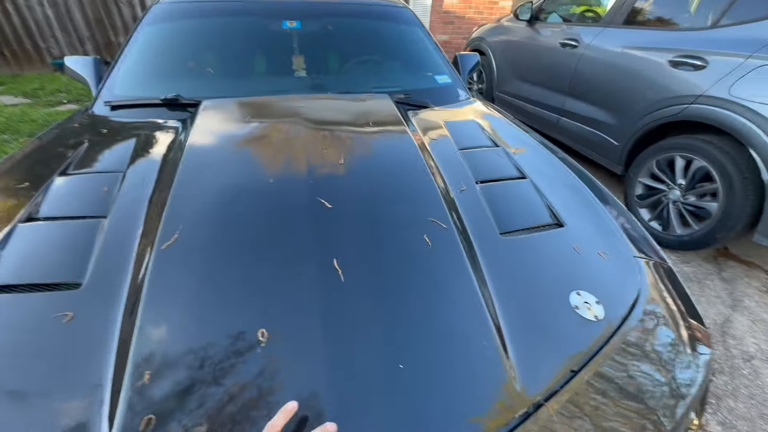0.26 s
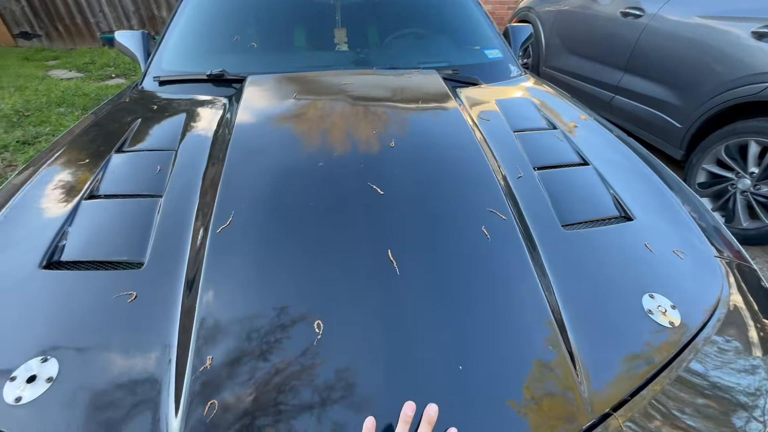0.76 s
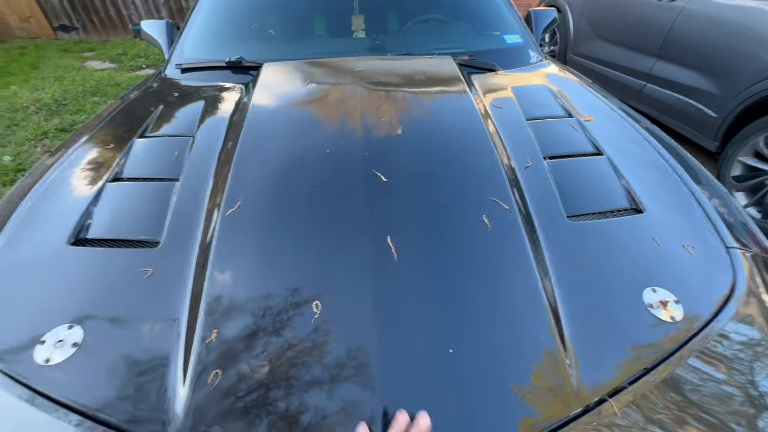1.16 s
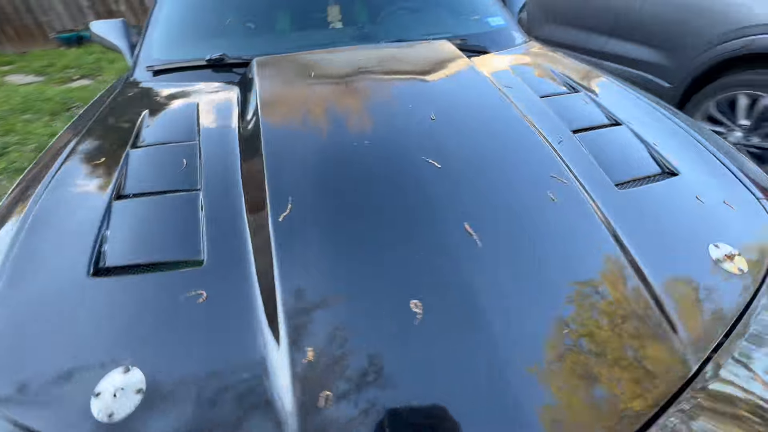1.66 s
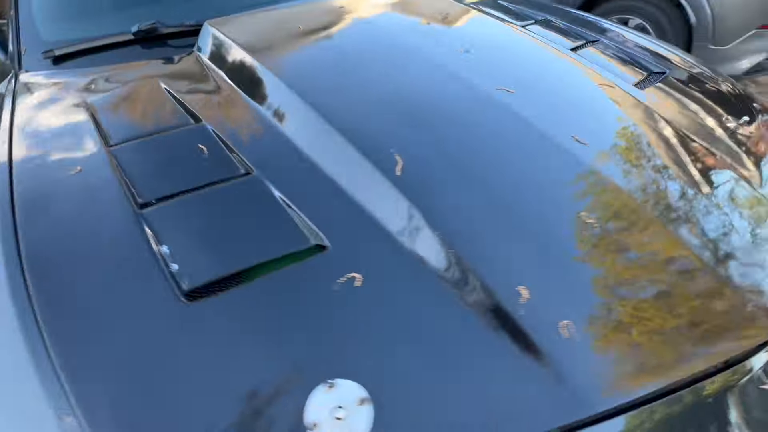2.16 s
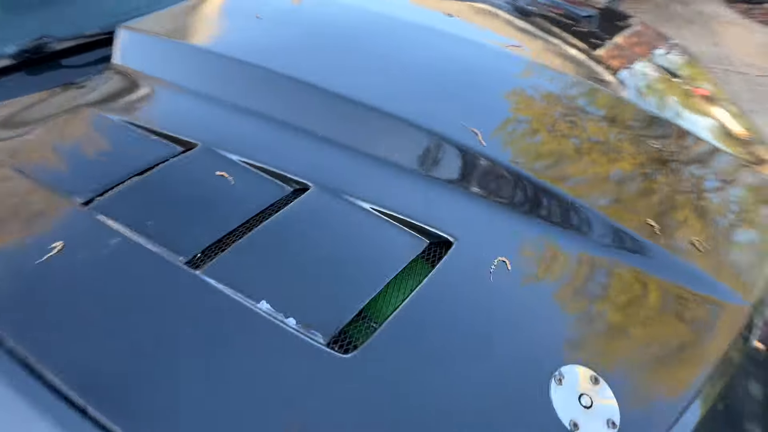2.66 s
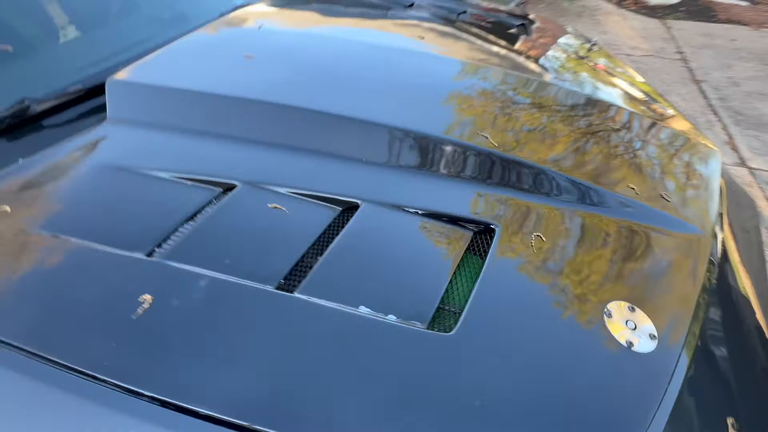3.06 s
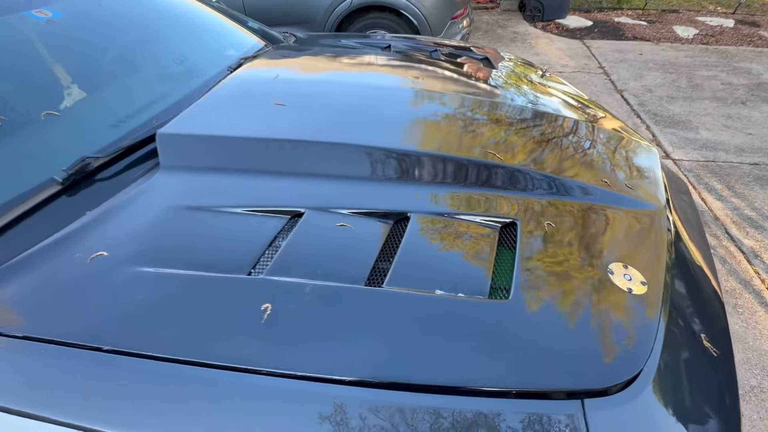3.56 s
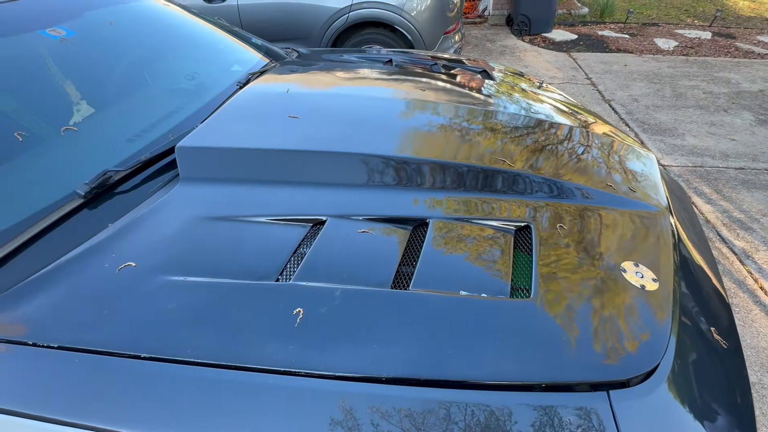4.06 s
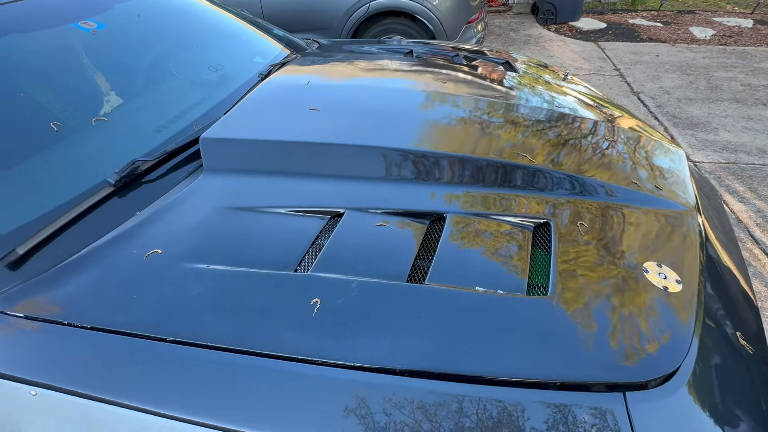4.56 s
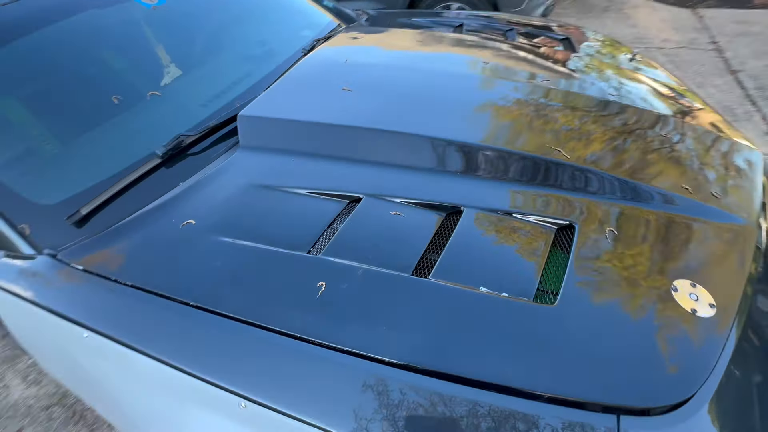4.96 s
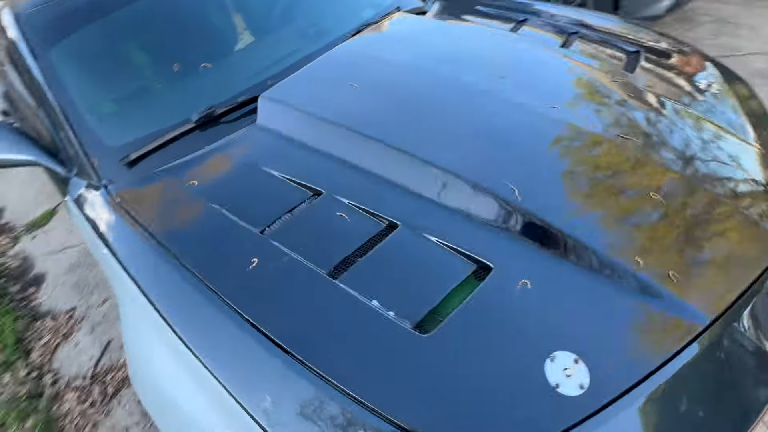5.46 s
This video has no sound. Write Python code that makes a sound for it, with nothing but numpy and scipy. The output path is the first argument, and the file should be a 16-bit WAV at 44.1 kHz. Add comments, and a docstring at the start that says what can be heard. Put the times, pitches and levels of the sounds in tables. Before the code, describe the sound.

A car hood falls onto its safety catch at about 0.05 s: a hollow sheet-metal boom with a clattering steel clack and quick weakening bounces. From 0.5 s a palm pushes it down, with growing rubbing and scraping, spring creaks near 0.7 and 0.78 s, and a brief rough squeal jumping from high to lower pitch. At 0.83 s the latch snaps shut, brighter and louder, with a deep panel thump and short driveway echo. Then it is quiet outdoors, with soft town rumble and faint hiss. A songbird whistles and slurs from 1 to 2.3 s and again after 5 s; raspy chips, tiny pips and hoarse calls fill 3 to 5 s. Clothes rustle close by, sleeve strokes and dry clicks clustering at 2.4-3.4 s. A low engine drone strengthens after 3 s, strongest around 4.5-5.1 s, leaning left, while another engine rises in pitch farther off and tyre roar passes near 4.4 s.

```python
"""A car hood thuds onto its safety catch; a hand then presses it home, the latch squeals and snaps shut.
The panel booms from ringing modes and dense body noise; the latch cracks with short filtered noise.
The squeal is a jittery stick-slip tone whose overtones ring the latch plate.
Nearby an engine drones in harmonics, a second gathers speed further off, birds whistle on gliding tones
and shaped noise makes the clothes rustling close to a two-port phone microphone."""
import sys
import numpy as np
from scipy import signal
from scipy.fft import rfft, irfft, next_fast_len
from scipy.io import wavfile
from scipy.ndimage import uniform_filter1d, map_coordinates

SR = 44100
rng = np.random.default_rng(int(sys.argv[2]) if len(sys.argv) > 2 else 0)


def master(y):
    """Save y as 16-bit WAV."""
    cut = np.clip(np.atleast_2d(y).T, -1, 1)
    pcm = np.round(cut * 32767)  # scale
    wavfile.write(sys.argv[1], SR, pcm.astype(np.int16))


N = 251811
T = np.arange(N) / SR


def undb(db):
    """Decibels to gain."""
    return 10 ** (np.asarray(db) / 20)


def unit(x):
    """Scale to rms 1."""
    return x / np.sqrt(np.mean(x ** 2))


def curves(rows):
    """Columns of a table, joined by straight lines in time."""
    time_s, *columns = np.transpose(rows)
    return [np.interp(T, time_s, column) for column in columns]


def at(points, hz):
    """Read a table on a log-frequency axis."""
    f, value = np.transpose(points)
    return np.interp(np.log(hz + 1e-3), np.log(f), value)


def colour(x, points):
    """Filter by a gain curve of (hz, gain_db) points."""
    size = next_fast_len(x.shape[-1])
    hz = np.arange(size // 2 + 1) * SR / size
    spectrum = rfft(x, size) * undb(at(points, hz))
    return irfft(spectrum, size)[..., :x.shape[-1]]


def walk(rate_hz):
    """Smooth random drift with a spread near 1."""
    step = int(SR / rate_hz)
    knots = rng.standard_normal(N // step + 2)
    drift = np.interp(np.arange(N) / step, np.arange(N // step + 2), knots)
    return 1.22 * uniform_filter1d(drift, step // 2)


def add(out, start_s, x):
    """Mix x in from start_s."""
    i = int(start_s * SR)
    out[..., i:i + x.shape[-1]] += x[..., :N - i]


def sine(hz):
    """Pure tone on a moving pitch; rms 1."""
    return np.sqrt(2) * np.sin(2 * np.pi * np.cumsum(hz) / SR)


def stack(hz, orders, flutter_db=0, flutter_hz=5):
    """Partials on multiples of a moving pitch, each wavering in level on its own."""
    phase = 2 * np.pi * np.cumsum(hz) / SR
    out = 0
    for multiple, db in orders:
        level = undb(db + flutter_db * walk(flutter_hz))
        partial = np.sqrt(2) * np.sin(multiple * phase + rng.uniform(0, 2 * np.pi))
        out = out + level * partial * (multiple * hz < SR / 2)
    return out


def swell(centre_s, half_width_s, db):
    """Bell-shaped rise and fall; 1/e at half_width_s."""
    return undb(db) * np.exp(-((T - centre_s) / half_width_s) ** 2)


def ports(x, lag_ms, left_db):
    """Sound reaches the right port lag_ms late; left_db is left over right."""
    late = map_coordinates(x, [np.arange(N) - lag_ms * 1e-3 * SR], order=3)
    return np.array([x * undb(left_db / 2), late * undb(-left_db / 2)])


def diffuse(size, split_hz):
    """Noise from all sides: alike at both ports below split_hz, unrelated above."""
    a, b = rng.standard_normal((2, size))
    highpass = signal.butter(1, min(split_hz, SR / 4), "high", fs=SR, output="sos")
    b = signal.sosfilt(highpass, b)
    return np.array([a + b, a - b])


def ring(spectrum, t60s, split_hz, seconds=1):
    """Dense modes: noise whose octaves die away at their own rates; energy 1."""
    t = T[:int(seconds * SR)]
    spectra = rfft(colour(diffuse(len(t), split_hz), spectrum))
    hz = np.arange(len(t) // 2 + 1) * SR / len(t)
    octave = np.log2(np.clip(hz, 32, 16384))
    out = 0
    for k in range(5, 15):
        band = irfft(spectra * np.maximum(1 - abs(octave - k), 0), len(t))
        out = out + band * np.exp(-np.log(1000) * t / at(t60s, 2 ** k))
    return out / np.sqrt(np.sum(out ** 2) / 2)


def scatter(x, tail):
    """Convolve a mono or two-port sound with a two-port tail."""
    return signal.fftconvolve(np.atleast_2d(x), tail, axes=1)[:, :N]


# outdoor air spectrum: hz [Hz], density_db [dB per Hz, relative]
AIR = [(15, -55.5), (25, -30.5), (48, -3), (75, -0.5), (100, 4), (140, -5.5), (175, -4), (250, -8.5),
       (295, -8), (480, -16), (1580, -25), (2630, -34.5), (4000, -43), (5500, -56.5), (9000, -56),
       (12000, -72)]


def air(low_db=-44, high_db=-56, left_db=3):
    """Wavering town rumble, nearly alike at both ports, under a smooth distant hiss."""
    noise = colour(diffuse(N, split_hz=330), AIR)
    low = signal.sosfiltfilt(signal.butter(2, 500, fs=SR, output="sos"), noise)
    balance_db = np.array([[left_db], [-left_db]]) / 2
    rumble = unit(low) * undb(low_db + 0.36 * walk(27) + balance_db)
    hiss = unit(noise - low) * undb(high_db + 0.21 * walk(3.4))
    return rumble + hiss


# road roar spectrum: hz [Hz], density_db [dB per Hz, relative]
ROAR = [(100, -7), (300, -5), (480, -9), (640, 4), (1000, 5), (1350, -5), (1700, -10.5), (2050, -23),
        (2450, -14), (3100, -26.5), (4000, -39.5), (9000, -71.5)]


def road_roar(nearest_s=4.38, half_power_s=0.53, peak_db=-47.5):
    """Tyre-road noise swells and fades as the distance to a passing vehicle changes."""
    distance = np.hypot(1, (T - nearest_s) / half_power_s)
    noise = unit(colour(rng.standard_normal(N), ROAR))
    return noise * undb(peak_db + 1.1 * walk(6)) / distance


# partials of the far engine: shaft_multiple [ratio], level_db [dB, relative]
FAR_ORDERS = [(3, -1), (6, 0.5), (8, -2), (9, -1), (12, -14), (13, -14.5), (15, -15.5), (20, -14),
              (22, -16), (25, -16.5), (27, -15.5)]
# its loudness: time_s [s], level_db [dB]
FAR_LEVEL = [(1.1, -65.5), (1.6, -51), (2.4, -54.5), (3.2, -49.5), (4, -56.5), (5, -49.5)]


def far_engine(start_hz=35.37, rise_hz_per_s=1.04):
    """Engine gathering speed: shaft harmonics on a steadily rising pitch."""
    shaft_hz = (start_hz + rise_hz_per_s * T) * (1 + .002 * walk(13))
    level_db, = curves(FAR_LEVEL)
    return stack(shaft_hz, FAR_ORDERS, flutter_db=3.5, flutter_hz=2.4) * undb(level_db)


# droning engine: time_s [s], level_db [dB], upper_db [dB, scales the exhaust partials]
DRONE = [(1.1, -49, -69.5), (2.6, -48, -65.5), (3.4, -36, -65), (4.05, -37, -50), (4.5, -32.5, -48),
         (5.1, -32, -48), (5.5, -37, -59)]
# its firing rate: time_s [s], firing_hz [Hz]
FIRING = [(1.3, 95.93), (3.1, 98.18), (4, 97.3), (4.4, 98.6), (5.7, 98.16)]
# its exhaust partials: firing_multiple [ratio], level_db [dB, relative]
EXHAUST = [(2, -10), (3, -14.5), (4, -3), (5, -11.5), (5.5, -14), (5.75, -12), (6, 1), (6.75, -11),
           (7, -9.5), (7.75, -6.5), (8, -8), (9, -10), (9.5, -9.5), (10.25, -8.5), (11, -11.5)]


def drone():
    """Exhaust pulses: a strong tone at the firing rate under fluttering upper partials."""
    level_db, upper_db = curves(DRONE)
    firing_hz, = curves(FIRING)
    firing_hz = firing_hz * (1 + 0.0019 * walk(14))
    tone = sine(firing_hz) * undb(level_db + 0.28 * walk(10))
    return tone + stack(firing_hz, EXHAUST, flutter_db=3.0, flutter_hz=4) * undb(upper_db)


def engines():
    """Both engines and the road roar arrive from one side, left port first."""
    return ports(drone() + far_engine() + road_roar(), lag_ms=0.42, left_db=4.5)


def note(hz, db, rasp, edge=.5):
    """Bird note on a trembling pitch; edge is the share spent swelling and fading."""
    hz = hz * (1 + rasp * walk(780)[:len(hz)])
    return undb(db) * signal.windows.tukey(len(hz), edge) * sine(hz)


def glide(length_s, start_hz, middle_hz, end_hz):
    """Pitch that bends through three points."""
    bend = np.polyfit([0, .5, 1], [start_hz, middle_hz, end_hz], 2)
    return np.polyval(bend, np.linspace(0, 1, int(length_s * SR)))


def calls(rows, length_s, fall, rasp):
    """Calls whose pitch falls ever faster, losing the share fall by the end."""
    out = np.zeros(N)
    for start_s, hz, db in rows:
        pitch_hz = glide(length_s, hz, hz * (1 - fall / 4), hz * (1 - fall))
        add(out, start_s, note(pitch_hz, db, rasp, edge=0.92))
    return out


def trees(dry_birds, direct_db, echo_db, echo_t60_s):
    """Trees and house fronts scatter the birds into a decaying noise tail."""
    t60s = [(500, echo_t60_s), (8000, echo_t60_s)]
    echo = ring([(500, 0.0057), (8000, 0.016)], t60s, split_hz=500)
    direct = ports(dry_birds, lag_ms=0.074, left_db=1.5)
    return undb(direct_db) * direct + undb(echo_db) * scatter(dry_birds, echo)


# hoarse calls of a distant bird: start_s [s], pitch_hz [Hz], level_db [dB before trees]
HOARSE = [(3.79, 2586, -60.5), (3.9, 1748, -55.5), (4.12, 2500, -59), (4.29, 2555, -55.5),
          (4.63, 2500, -58.5), (4.9, 2310, -56)]


def hoarse_bird():
    """Strong pitch jitter roughens each call."""
    dry_calls = calls(HOARSE, length_s=.14, fall=.04, rasp=.07)
    return trees(dry_calls, direct_db=-6.5, echo_db=-5.5, echo_t60_s=0.7)


# raspy falling chips: start_s [s], pitch_hz [Hz], level_db [dB before trees]
CHIPS = [(.53, 5180, -59), (2.22, 4380, -58.5), (3.07, 3755, -56.5), (3.95, 4660, -68.5), (4.04, 3700, -59),
         (4.055, 4600, -62), (4.14, 3810, -59), (4.57, 4760, -62.5), (4.66, 3500, -63.5), (4.68, 4840, -70),
         (4.94, 4900, -57), (5.0, 3810, -66), (5.15, 3410, -63)]


def chipping_birds():
    """Short raspy tones that fall by a tenth."""
    dry_calls = calls(CHIPS, length_s=0.065, fall=.1, rasp=0.024)
    return trees(dry_calls, direct_db=-8.5, echo_db=-7.5, echo_t60_s=0.61)


# clear pips of a small bird: start_s [s], pitch_hz [Hz], level_db [dB before trees]
PIPS = [(3.445, 5070, -66), (3.462, 3975, -59.5), (3.503, 3450, -64.5), (3.558, 5050, -69),
        (3.585, 3960, -69)]


def pipping_bird():
    """Brief tones with little jitter and hardly any fall."""
    dry_calls = calls(PIPS, length_s=0.026, fall=0.017, rasp=.006)
    return trees(dry_calls, direct_db=-1.0, echo_db=-8.0, echo_t60_s=0.4)


# phrases: start_s [s], stretch [ratio], whistle_length_s [s], whistle_hz [Hz],
# whistle_db [dB before trees], slurs_db [dB before trees], max_slurs [count]
SONG = [(1.024, 0.96, 0.21, 3610, -63, -58.5, 3), (1.399, 1.01, 0.11, 3568, -49.5, -54.5, 3),
        (1.775, 1.02, 0.16, 3657, -59.5, -57.5, 7), (2.175, 1, 0.089, 3550, -56, -57, 0),
        (5.07, 1, 0.091, 3560, -77.5, -55, 3), (5.44, 1.03, 0.23, 3610, -63, -52.5, 1)]
# slurs of a phrase: offset_s [s before stretch], length_s [s], start_hz, middle_hz, end_hz [Hz before scatter],
# level_db [dB over slurs_db, before scatter]
PHRASE = [(0.178, 0.048, 2312, 2790, 2990, 1.5), (0.274, 0.029, 1960, 2370, 2640, 1),
          (0.314, .034, 2873, 2633, 2130, 3)]
# short falling notes before some slurs: start_s [s], pitch_hz [Hz], level_db [dB before trees]
GRACE_NOTES = [(1.54, 2950, -55.5), (1.918, 2950, -58), (5.586, 2950, -54.5)]


def songbird():
    """A whistle scoops up and holds unsteadily, then up to three slurs vary in pitch and level."""
    scoop_hz, scoop_s, waver_db = 299, 0.015, 2.8
    slur_scatter, slur_scatter_db = .015, 1.5  # pitch share, level
    song = calls(GRACE_NOTES, length_s=.026, fall=0.21, rasp=0.019)
    for start_s, stretch, held_s, hz, whistle_db, slurs_db, max_slurs in SONG:
        pitch_hz = hz - scoop_hz * np.exp(-T[:int(held_s * SR)] / scoop_s)
        waver = walk(45)[:len(pitch_hz)]
        whistle = note(pitch_hz * (1 + .003 * waver), whistle_db + waver_db * waver, rasp=.006, edge=.2)
        add(song, start_s, whistle)
        for offset_s, length_s, start_hz, middle_hz, end_hz, db in PHRASE[:round(max_slurs)]:
            sharp, loud = rng.standard_normal(2)
            pitch_hz = glide(length_s, start_hz, middle_hz, end_hz) * (1 + slur_scatter * sharp)
            slur = note(pitch_hz, slurs_db + db + slur_scatter_db * loud, rasp=0.014, edge=0.52)
            add(song, start_s + stretch * offset_s, slur)
    return trees(song, direct_db=-3.5, echo_db=-5.0, echo_t60_s=0.99)


# bouts of cloth: centre_s [s], half_width_s [s], level_db [dB]
RUSTLES = [(0.668, 0.018, -60), (1.775, 0.31, -61), (2.453, 0.15, -59.5), (3.175, 0.19, -60),
           (5.235, 0.17, -62), (5.67, 0.025, -54.5)]
# cloth spectrum: hz [Hz], gain_db [dB, relative]
CLOTH = [(300, 13.5), (1600, 2.5), (3500, 1), (6000, -12.5), (9000, -8.5), (11000, -20.5), (15000, -14)]


def rustles(folds_db=1.5, crackle_db=2.0):
    """Short swells of cloth noise with a fast random crackle."""
    bouts = sum(swell(*bout) for bout in RUSTLES) * undb(folds_db * walk(35))
    crackle = diffuse(N, split_hz=600) * undb(crackle_db * walk(400))
    return bouts * unit(colour(crackle, CLOTH))


# sleeve strokes: centre_s [s], half_width_s [s], level_db [dB before shared peaks], centre_hz [Hz]
SWISHES = [(2.48, 0.07, -62, 2094), (2.865, 0.17, -50, 940), (2.975, 0.089, -48.5, 1630),
           (3.134, 0.16, -54.5, 2110)]
# stroke spectrum: centre_multiple [ratio], gain_db [dB, relative]
SWISH = [(.12, -18), (.35, 4), (.62, 1.5), (1, 0), (1.45, -8), (1.9, -12), (2.6, -36), (7, -60)]
# peaks that every stroke shares: hz [Hz], gain_db [dB]
SWISH_PEAKS = [(1100, 1), (1350, 0), (1750, 1.5), (2050, -3), (2450, 5), (3100, -8.5), (3700, 3),
               (4600, -3.5)]


def sleeve(catch_db=1.2, grain_db=2):
    """Soft strokes of grainy noise, each coloured around its own centre."""
    strokes = 0
    for centre_s, half_width_s, db, centre_hz in SWISHES:
        fibres = diffuse(N, split_hz=610) * undb(catch_db * walk(55) + grain_db * walk(600))
        spectrum = [(centre_hz * k, gain_db) for k, gain_db in SWISH]
        strokes = strokes + swell(centre_s, half_width_s, db) * unit(colour(fibres, spectrum))
    return colour(strokes, SWISH_PEAKS)


# handling ticks: start_s [s], level_db [dB before gain_db]
TICKS = [(2.353, -52), (2.45, -44), (3.033, -48), (3.22, -45), (3.38, -52), (5.293, -57), (5.311, -57)]


def ticks(t60_s=.014, gain_db=9):
    """Small dry clicks of quickly dying noise."""
    out = np.zeros((2, N))
    spectrum = [(800, 1), (4500, 2), (7000, -5), (15000, -12)]
    for start_s, db in TICKS:
        click = ring(spectrum, [(500, t60_s), (8000, t60_s)], split_hz=3000, seconds=.04)
        add(out, start_s, undb(db + gain_db) * click)
    return out


# palm pushing the hood against its springs: time_s [s], level_db [dB]
PRESS = [(.45, -71.5), (.57, -55.5), (.7, -40.5), (.82, -24.5), (.86, -57)]
# rubbing of hinges and stops: hz [Hz], gain_db [dB, relative]
PRESS_COLOUR = [(30, -7.5), (80, 12), (250, 6.5), (450, 6), (750, -2.5), (1200, -17), (1800, -10),
                (2700, -18.5), (4000, -33.5), (12000, -49.5)]


def press():
    """Hinges and rubber stops rub as the panel is pushed down."""
    level_db, = curves(PRESS)
    pushing = (T > PRESS[0][0]) * (T < PRESS[-1][0])
    rubbing = unit(colour(diffuse(N, split_hz=560), PRESS_COLOUR))
    return rubbing * undb(level_db + 2 * walk(82)) * pushing


# creaks of the hinge springs: centre_s [s], half_width_s [s], level_db [dB]
CREAKS = [(.689, .02, -43.5), (0.776, .025, -36.5)]
# spring resonances: hz [Hz], gain_db [dB, relative]
CREAK_COLOUR = [(200, -16.5), (520, -2), (760, 6), (1000, -4), (1300, -13.5), (2000, -16.5), (2550, -3.5),
                (3500, -27.5), (5200, -27.5), (7000, -33.5), (15000, -40)]


def grains(per_s, scatter_db):
    """Tiny slips at random moments and of random size; rms 1."""
    hits = rng.random(N) < per_s / SR
    sizes = undb(scatter_db * np.clip(rng.standard_normal(N), -2, 2))
    return unit(hits * sizes * rng.choice([-1, 1], N))


def creaks(slips_per_s=750, t60_s=0.023):
    """Hinge springs give way in runs of small slips that ring them."""
    spring = ring(CREAK_COLOUR, [(500, t60_s), (8000, t60_s)], split_hz=450, seconds=0.044)
    slips = grains(slips_per_s, scatter_db=0.5) * sum(swell(*creak) for creak in CREAKS)
    return scatter(slips, spring)


# steel-on-steel spectrum: hz [Hz], gain_db [dB, relative]
SCRAPE_COLOUR = [(300, -20), (1000, -5), (1400, -0.5), (1800, 1.5), (2100, -6), (2500, -5), (3100, -20.5),
                 (5500, -19), (12000, -41)]


def scrape(start_s=0.5, end_s=.825, start_db=-62, rise_db_per_s=57, grain_db=2):
    """The striker slides down the dry latch ramp, louder as the push grows."""
    sliding = (T > start_s) * (T < end_s)
    level_db = start_db + rise_db_per_s * (np.minimum(T, end_s) - start_s)
    grit = diffuse(N, split_hz=700) * undb(grain_db * walk(500))
    return sliding * undb(level_db) * unit(colour(grit, SCRAPE_COLOUR))


# latch plate resonances: hz [Hz], gain_db [dB, relative]
OVERTONES = [(3100, -12.5), (3700, -12), (4500, 0.5), (4950, 1.5), (5400, -6), (6150, 1.5), (6700, -8),
             (7900, -9.5), (8900, 0), (10800, -9.5), (13500, -5.5), (15500, -11)]


def squeal(rows, lag_ms, left_db):
    """Stick-slip metal: an uneven tone, its overtones and scraping noise coloured by the latch plate."""
    scrape_db, scatter_db = -5, -14
    hz, tone_db, overtones_db = curves(rows)
    hz = hz * (1 + .024 * walk(1500) + 0.011 * walk(250))
    sounding = (T > rows[0][0]) * (T < rows[-1][0])
    harmonics = stack(hz, [(k, 0) for k in range(2, 11)], flutter_db=3.5, flutter_hz=160)
    slips = unit(harmonics) + undb(scrape_db) * rng.standard_normal(N)
    rasp = 1 + .26 * walk(1100)
    tone = undb(tone_db + 1.1 * walk(300)) * sine(hz) * rasp * sounding
    edge = undb(overtones_db) * unit(colour(slips, OVERTONES)) * sounding
    # the gap under the hood scatters part of it
    gap = ring([(500, 0.0022), (8000, 0.0017)], [(500, 0.16), (8000, 0.07)], split_hz=460, seconds=0.18)
    direct = ports(tone, lag_ms, left_db) + ports(edge, lag_ms=.036, left_db=-1.5)
    return direct + undb(scatter_db) * scatter(tone + edge, gap)


# first, higher squeal: time_s [s], pitch_hz [Hz], level_db [dB], overtones_db [dB]
SQUEAL_HIGH = [(.718, 2490, -50, -76), (.73, 2450, -41, -74), (.756, 2400, -44, -62),
               (.764, 2220, -28, -36), (.77, 2160, -31, -32), (.777, 2160, -24, -33),
               (.795, 2199, -23.5, -35), (.802, 2330, -19.5, -40), (.805, 2600, -29, -43),
               (.811, 2950, -31, -42)]
# second, lower squeal: time_s [s], pitch_hz [Hz], level_db [dB], overtones_db [dB]
SQUEAL_LOW = [(.799, 1690, -38, -55), (.81, 1660, -26, -34), (.8135, 1635, -16, -17),
              (.819, 1575, -13, -16.5), (.8235, 1540, -9, -17.5), (.8275, 1545, -9.5, -32),
              (.835, 1565, -9, -29), (.84, 1545, -22, -38)]


def latch_squeals():
    """Two overlapping squeals, each with its own port balance."""
    high = squeal(SQUEAL_HIGH, lag_ms=.11, left_db=-6.5)
    return high + squeal(SQUEAL_LOW, lag_ms=.21, left_db=-0.5)


# whole-panel heaves as the latch stops it: start_s [s], level_db [dB]
HEAVES = [(.057, -16.5), (0.837, -15)]


def heaves(pitch_hz=150.2, peak_s=.004):
    """Deep, quickly damped swing of the whole panel; its envelope peaks at peak_s."""
    out, t = np.zeros(N), T[:SR // 8]
    envelope = t / peak_s * np.exp(1 - t / peak_s)
    for start_s, db in HEAVES:
        add(out, start_s, -undb(db) * np.sin(2 * np.pi * pitch_hz * t) * envelope)
    return ports(out, lag_ms=.1, left_db=2.5)


def rebounds(start_s, first_db, gap_s, fade_db, count):
    """Times and levels of contacts that thin out and weaken; each gap is 1.1 times the last."""
    k = np.arange(count)
    gaps_s = gap_s * 1.1 ** k
    return zip(start_s + np.cumsum(gaps_s) - gaps_s, first_db - fade_db * k)


# steel latch spectrum: hz [Hz], gain_db [dB before tilt, relative]
LATCH = [(100, -15), (700, 1.5), (1100, 2.5), (1500, 9), (2400, -0.5), (3300, 4.5), (3900, -5.5),
         (4700, 2.5), (5700, -8), (9000, -8.5), (12000, -19.5), (16000, -14)]


def clack(level_db, tilt_db_per_octave=0):
    """One grainy crack of the steel latch; tilt pivots at 3 kHz."""
    t60_s, gain_db, grain_db = 0.077, 2, 3
    steel = [(hz, db + tilt_db_per_octave * np.log2(hz / 3000)) for hz, db in LATCH]
    crack = ring(steel, [(1000, t60_s), (12000, t60_s)], split_hz=200, seconds=0.079)
    return undb(level_db + gain_db) * crack * undb(grain_db * walk(700)[:crack.shape[1]])


# striker hits: start_s [s], level_db [dB before clack gain], fade_db [dB per rebound],
# tilt_db_per_octave [dB per octave]
STRIKES = [(0.042, -11, 5.5, -3), (0.0513, -0.5, 9, -1.5), (0.0602, -13, 1.5, 1), (0.8318, 8, 9, 3),
           (.8358, 3.5, 7, -1.5), (0.842, -11, 6, -1.5), (.871, -20, 3, 3.5)]


def latch_strikes():
    """The striker hits the latch and chatters in weakening rebounds."""
    out = np.zeros((2, N))
    for start_s, first_db, fade_db, tilt_db_per_octave in STRIKES:
        for hit_s, db in rebounds(start_s, first_db, .003, fade_db, count=4):
            add(out, hit_s, clack(db, tilt_db_per_octave))
    return out


# hood panel modes: hz [Hz], level_db [dB, relative], t60_s [s]
PANEL = [(59.54, -13.5, 0.55), (85, -16, 0.72), (113.1, -15.5, 0.55), (147, -14.5, 0.64), (176, -14, 0.38),
         (247, -18.5, 0.22), (272, -21.5, 0.48), (333, -8.5, 0.15), (370, -6, 0.11), (440, -5.5, 0.12),
         (492.5, -11.5, 0.11), (531, -13, 0.17), (575, -9.5, 0.13), (612.3, -2.5, 0.12), (671.5, -4, 0.14),
         (737, -7, 0.15), (807, -12, 0.13), (991, -13.5, 0.12), (1250, -17, 0.096), (1544, -11, 0.1)]
# dense car body modes: hz [Hz], gain_db [dB, relative]
BODY = [(25, -35), (55, -4.5), (120, -1.5), (230, -4.5), (400, -1), (640, 5), (800, -3), (1100, -7.5),
        (2000, -6), (4000, -21), (16000, -53.5)]
# their decay: hz [Hz], t60_s [s]
BODY_T60 = [(60, 0.54), (150, 0.34), (300, 0.34), (600, 0.079), (1200, 0.15), (8000, 0.081)]
# panel on its stops: start_s [s], thud_db [dB, relative], dull_hz [Hz, dulls above], fade_db [dB per bounce]
LANDINGS = [(0.0458, -14, 685, 5.5), (0.0557, -4.5, 663, 5), (0.0651, -10.5, 636, 9.5),
            (.0875, -13, 510, 4), (0.113, -16.5, 561, 8.5), (.137, -17, 265, 5.5), (0.8332, -10, 1410, 2),
            (0.8398, -3.5, 1290, 11.5), (0.8462, -4, 1010, 3.5), (.893, -18.5, 700, 12)]


def panel_landings(modes_db=-13, body_db=11, knock_db=-5, rattle_db=-13, left_db=3, lag_ms=0.25):
    """Each bounce shoves the panel, rings it and the body behind it, and rattles the latch."""
    out = np.zeros((2, N))
    age_s = np.maximum(T[:SR] - np.array([[0], [lag_ms * 1e-3]]), 0)
    modes = np.array([undb(db) * np.sin(2 * np.pi * hz * age_s) * np.exp(-np.log(1000) * age_s / t60_s)
                      for hz, db, t60_s in PANEL])
    sides = undb(np.array([[left_db], [-left_db]]) / 2)
    for start_s, first_db, dull_hz, fade_db in LANDINGS:
        # the shove is one quickly damped swing of air
        cycles = dull_hz * age_s
        knock = -np.sin(1.4 * np.pi * cycles) * 2 * cycles * np.exp(1 - 2 * cycles)
        # a softer contact (lower dull_hz) pushes longer and leaves the upper modes quiet
        contact = signal.butter(2, [42, dull_hz], "band", fs=SR, output="sos")
        for hit_s, thud_db in rebounds(start_s, first_db, .0068, fade_db, count=3):
            # every spot of the panel pushes some modes up and others down
            signs = rng.choice([-1, 1], len(PANEL))
            panel = undb(modes_db) * np.tensordot(signs, modes, 1)
            body = undb(body_db) * ring(BODY, BODY_T60, split_hz=450)
            boom = signal.sosfilt(contact, panel + body + undb(knock_db) * knock)
            add(out, hit_s, sides * undb(thud_db) * boom)
            add(out, hit_s, clack(thud_db + rattle_db))
    return out


def driveway(x, wet_db, delay_s=.012):
    """The neighbouring car, fence and wall return a short, thin echo."""
    spectrum = [(60, 2), (800, 0.0), (1550, 2), (2600, 1), (5000, -5.0), (10000, -6.0), (14000, -12.5)]
    t60s = [(100, 0.8), (1500, 0.17), (5000, 0.35), (9000, 0.48), (14000, 0.17)]
    tail = ring(spectrum, t60s, split_hz=320)
    out = x.copy()
    add(out, delay_s, undb(wet_db) * scatter(x, tail))
    return out


def scene():
    """The car in its driveway, with the street and the birds around it."""
    birds = hoarse_bird() + chipping_birds() + pipping_bird() + songbird()
    clothes = rustles() + sleeve() + ticks()
    hood = press() + creaks() + scrape() + heaves() + latch_strikes() + panel_landings()
    # the latch is shielded under the nose of the car, so little of its squeal reaches the walls
    car = driveway(hood, wet_db=-18.5) + driveway(latch_squeals(), wet_db=-26.0)
    return air() + engines() + birds + clothes + car


def record(dry):
    """The phone rounds the loudest peaks and cuts the top above 15.6 kHz."""
    rounded = dry / (1 + dry ** 6) ** (1 / 6)
    return signal.sosfilt(signal.ellip(10, .2, 70, 15600, fs=SR, output="sos"), rounded)


dry = scene()
out = record(dry)
master(out)
```